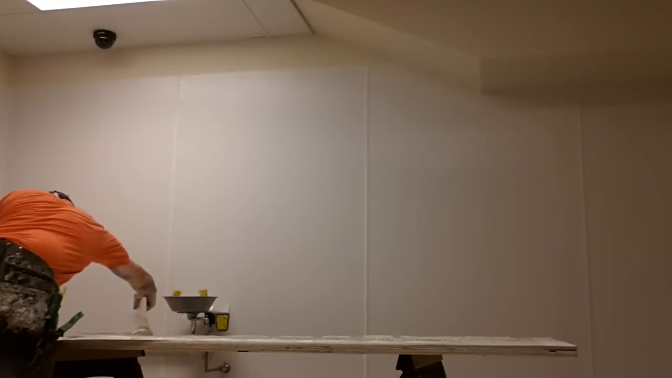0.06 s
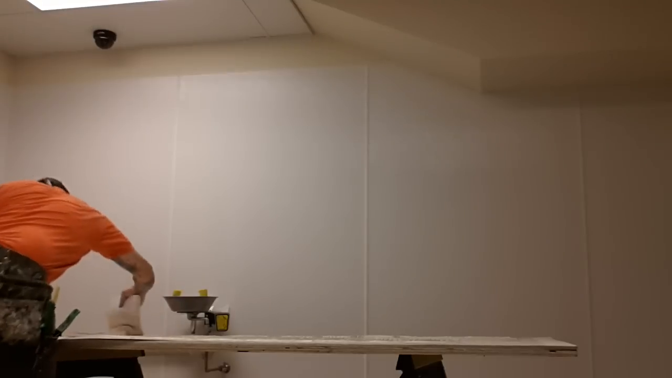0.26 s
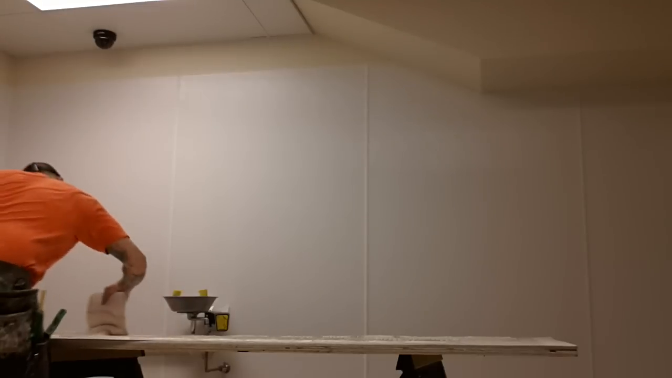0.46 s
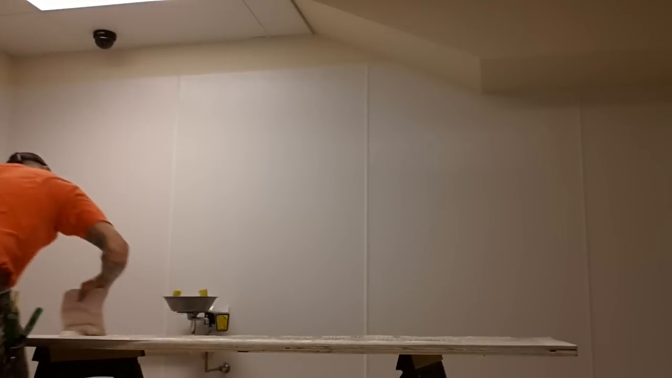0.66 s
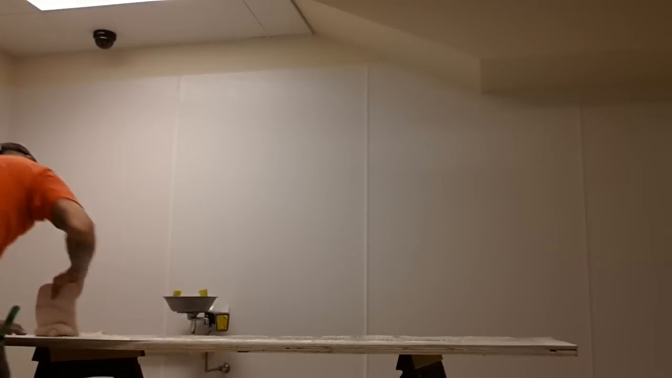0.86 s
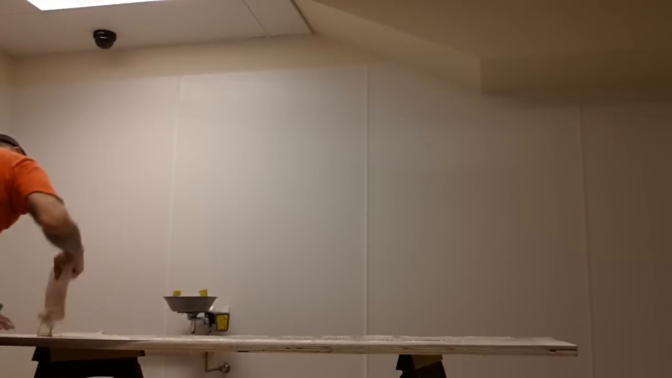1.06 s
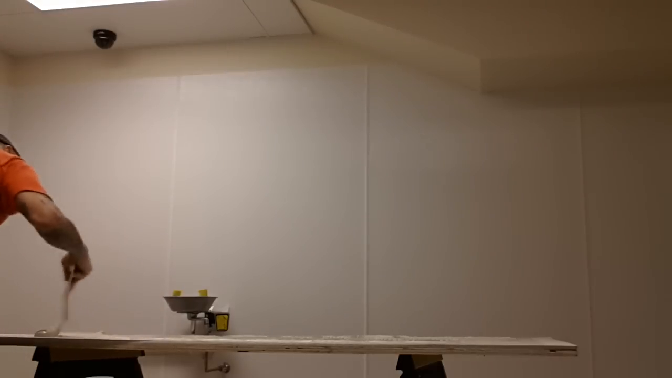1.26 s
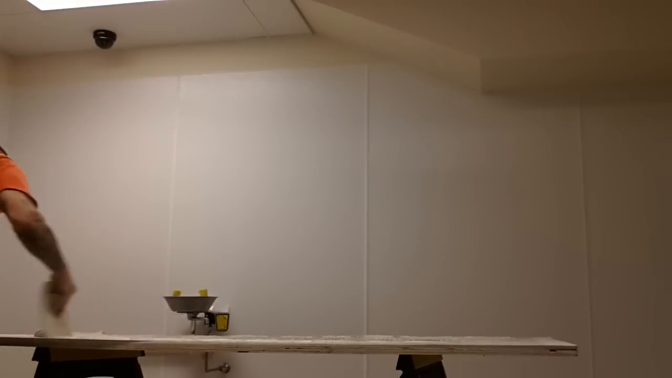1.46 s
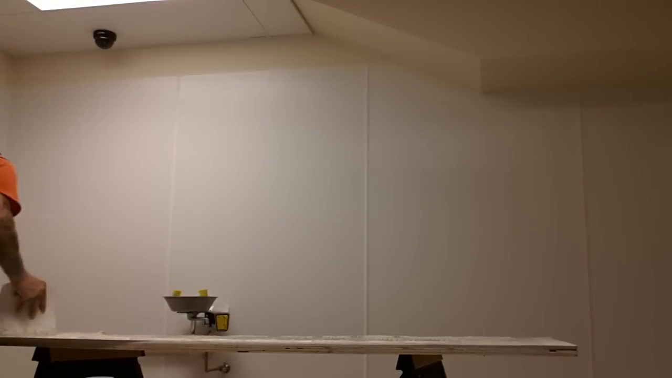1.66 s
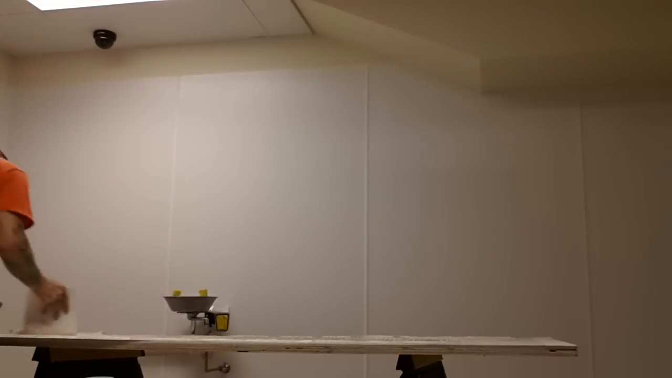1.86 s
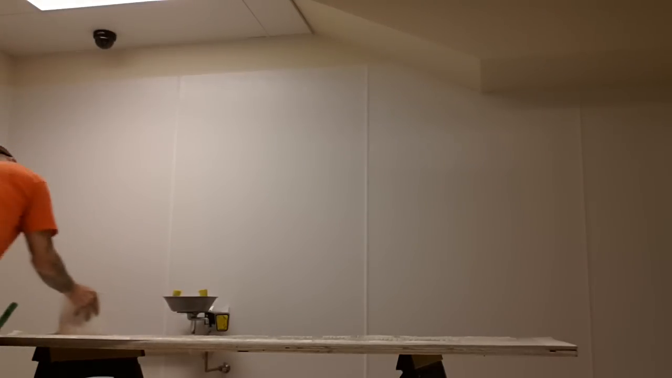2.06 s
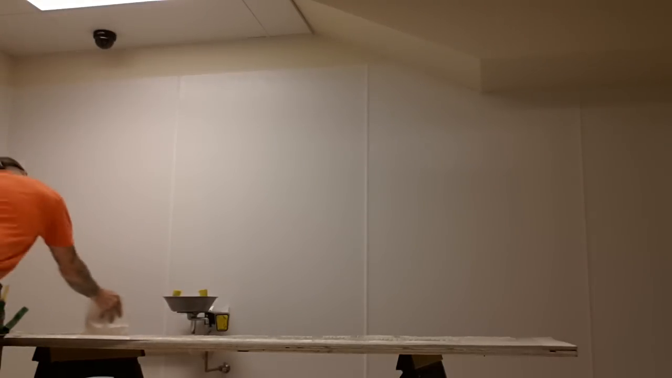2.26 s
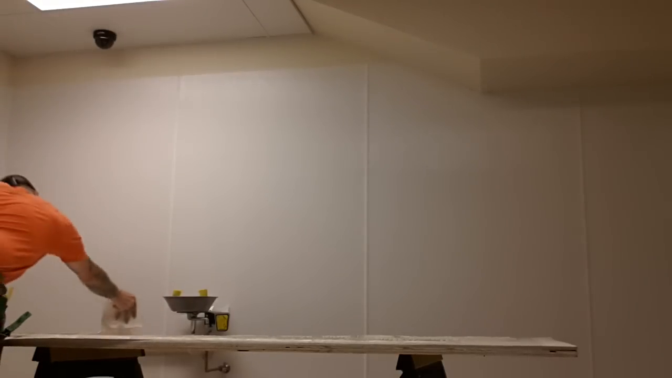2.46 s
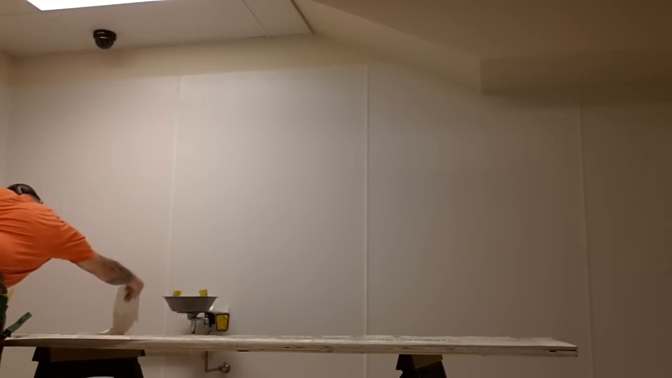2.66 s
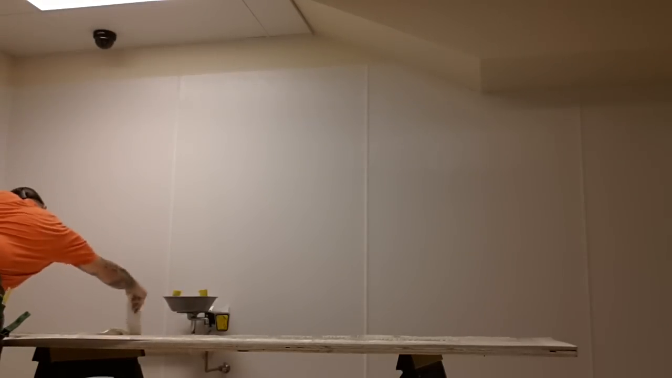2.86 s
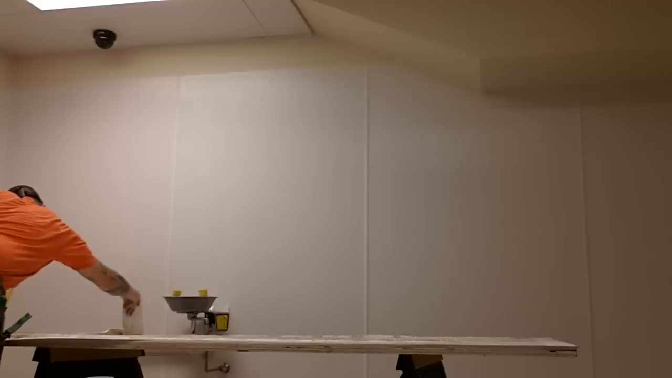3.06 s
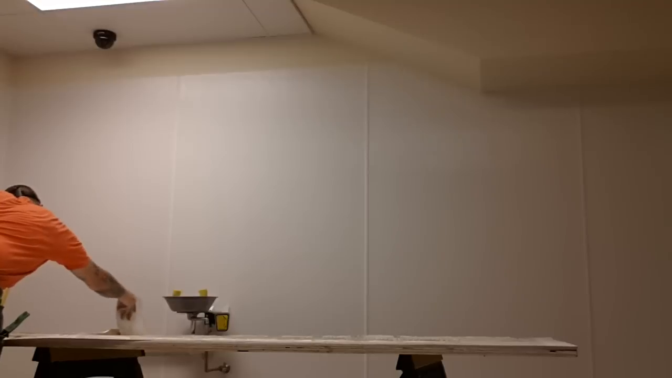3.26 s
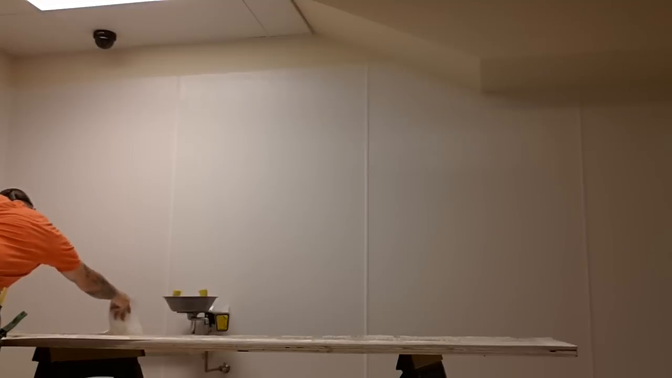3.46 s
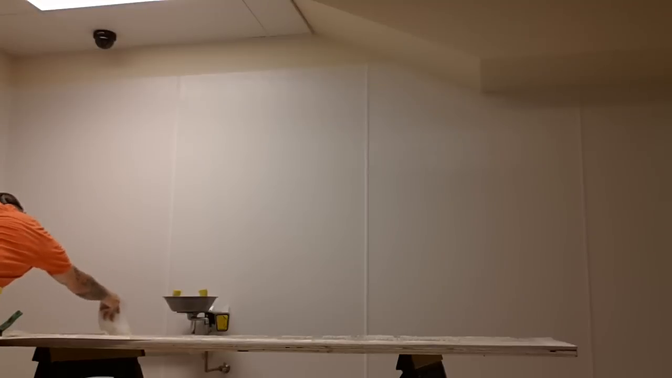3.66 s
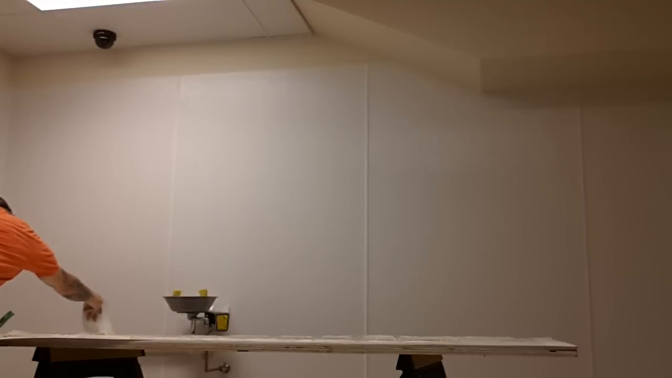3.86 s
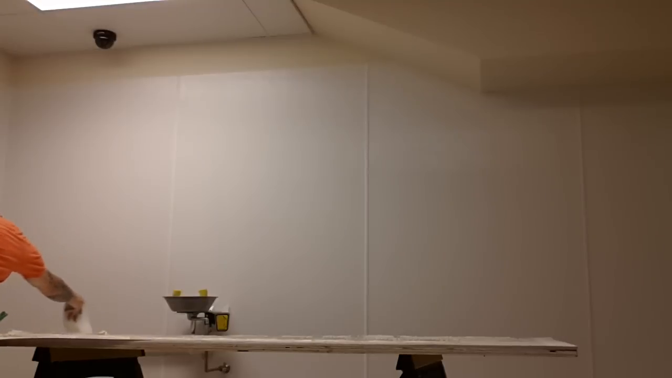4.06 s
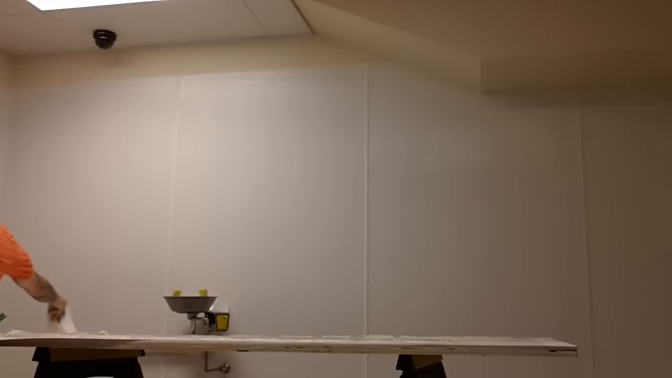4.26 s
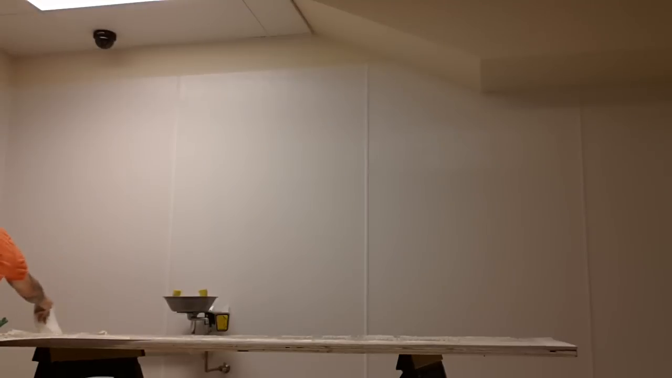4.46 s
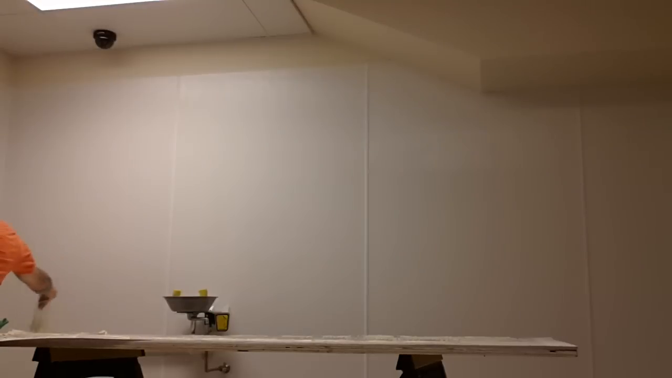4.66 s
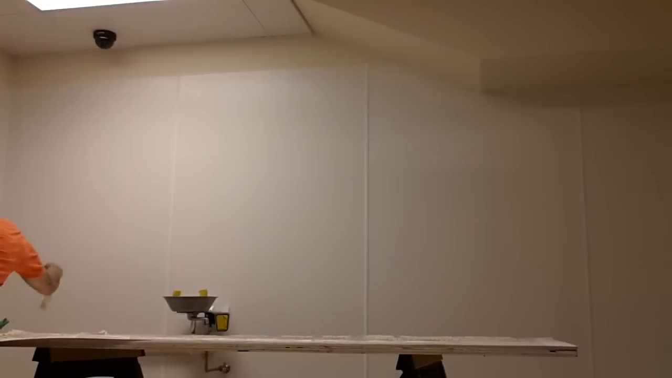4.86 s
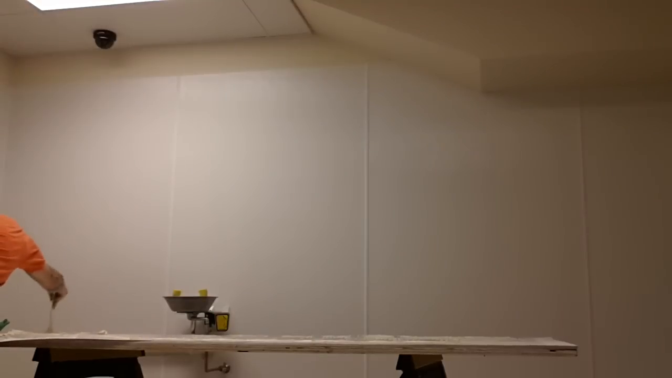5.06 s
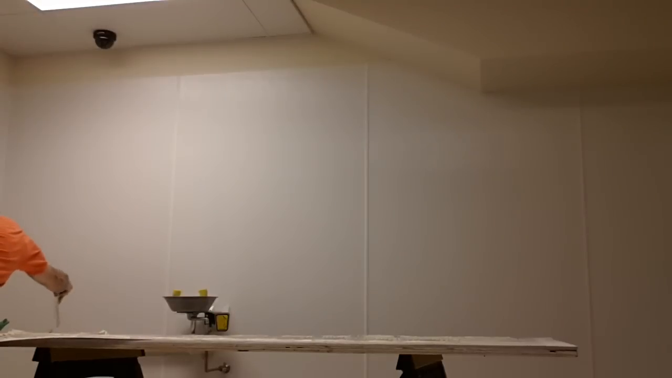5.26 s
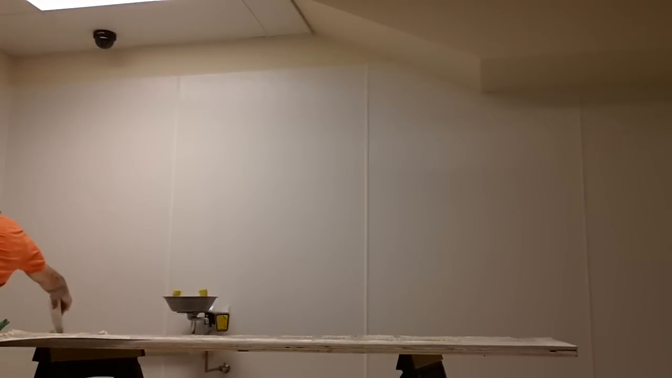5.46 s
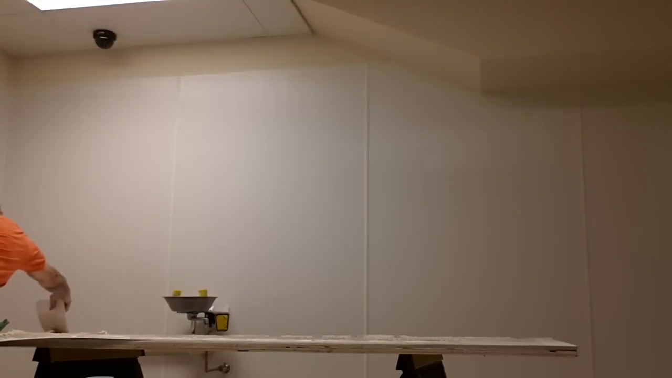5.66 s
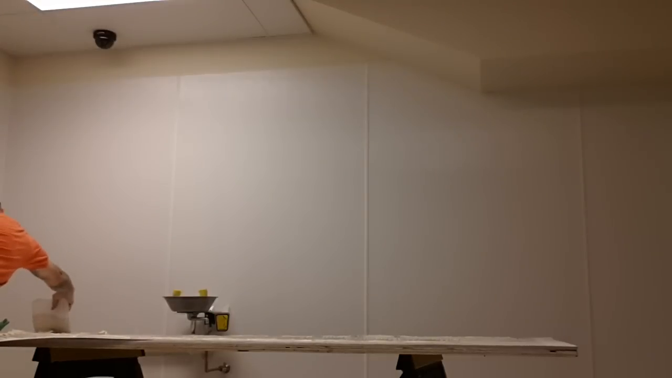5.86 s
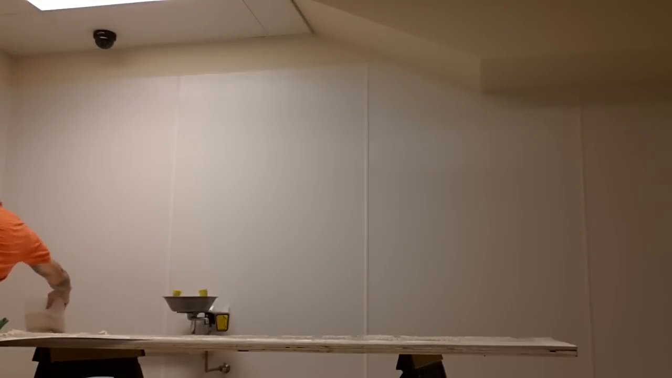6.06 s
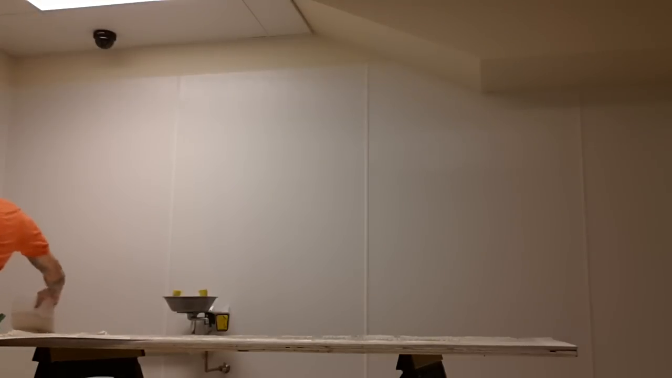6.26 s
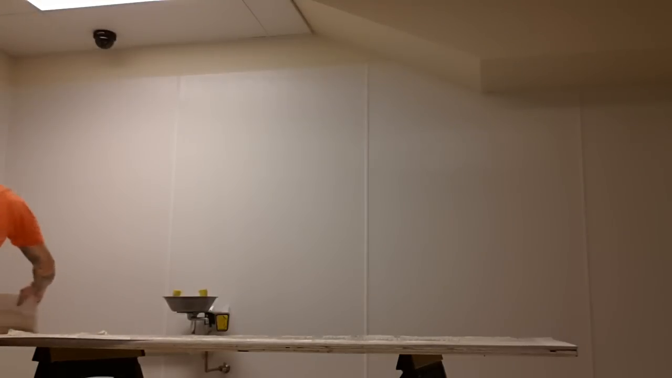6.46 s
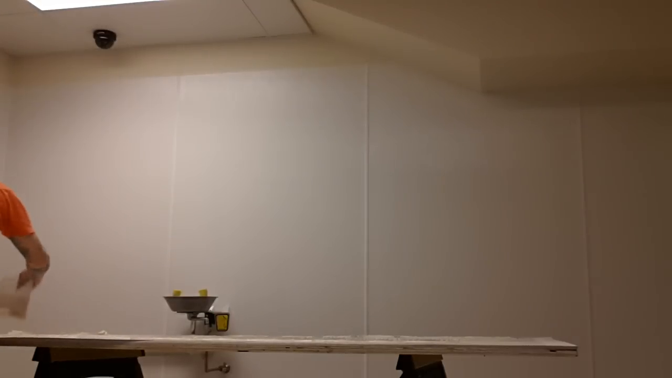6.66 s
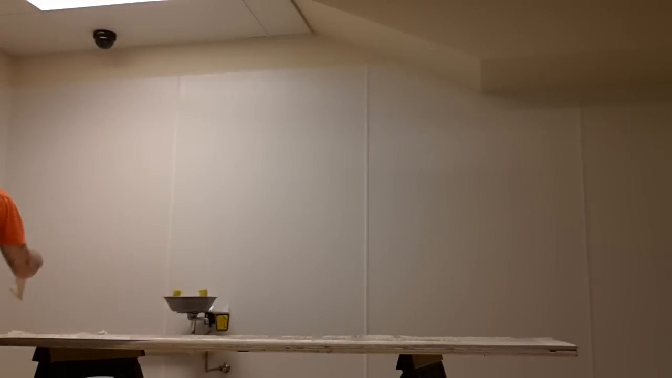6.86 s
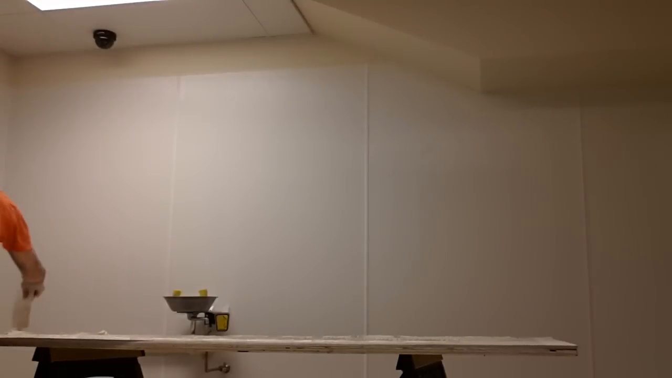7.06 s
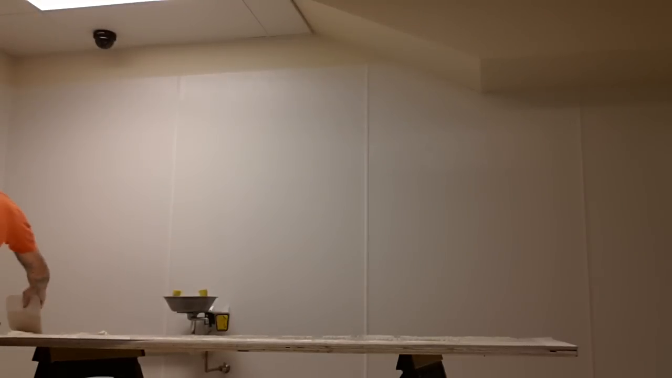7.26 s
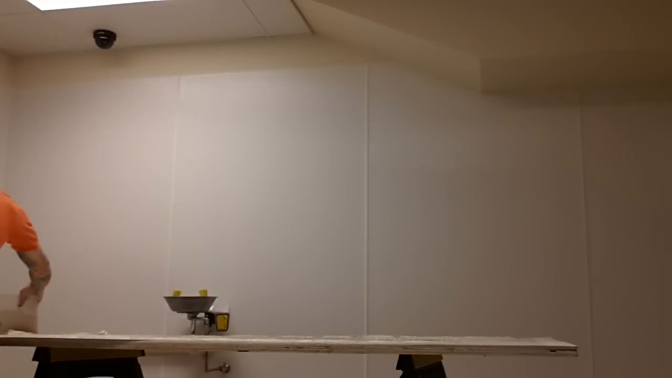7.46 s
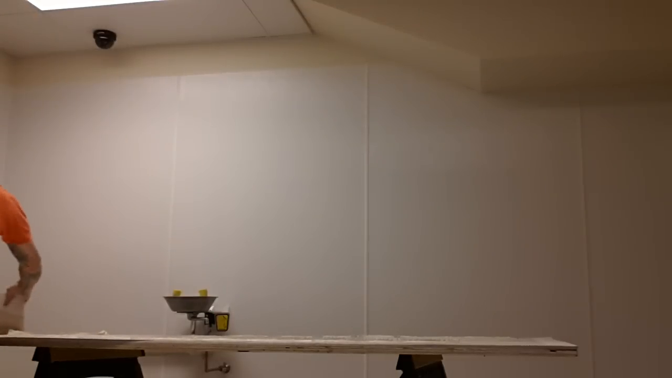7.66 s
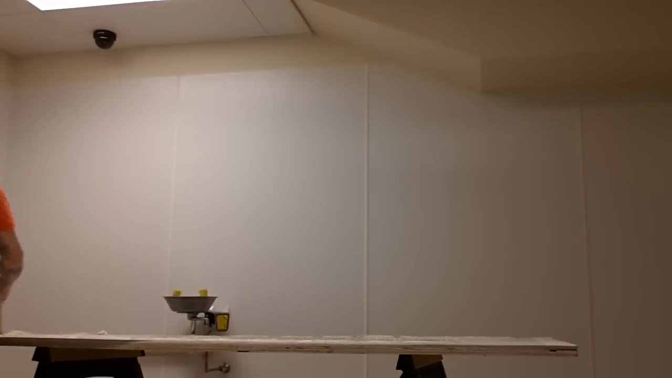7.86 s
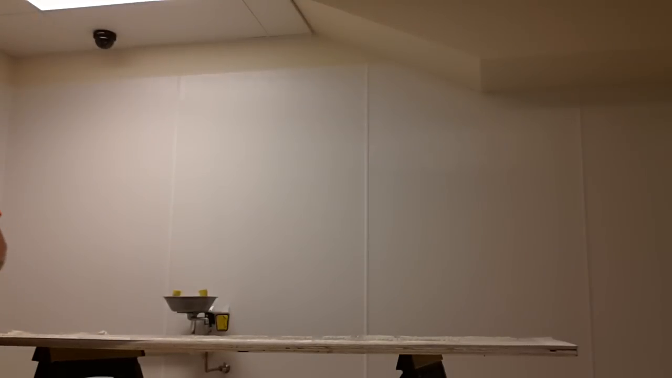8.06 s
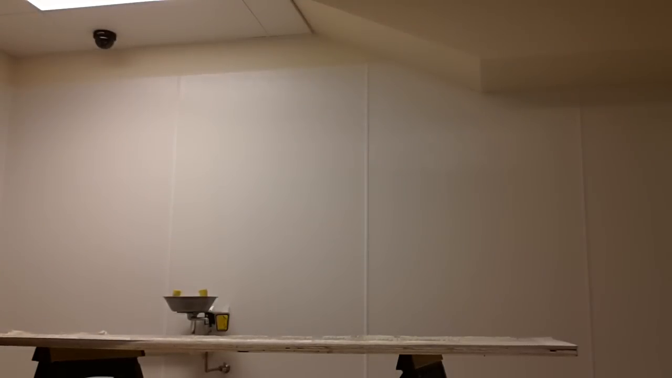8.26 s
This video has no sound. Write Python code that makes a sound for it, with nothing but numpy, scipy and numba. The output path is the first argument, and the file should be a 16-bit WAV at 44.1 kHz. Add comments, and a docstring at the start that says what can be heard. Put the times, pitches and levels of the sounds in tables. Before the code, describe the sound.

A steady low ventilation rumble with faint hiss fills a bare, hard-walled room. From 0 to 1.1 s a trowel drags with dense gritty hiss and hollow drumming, swelling around 0.5-0.8 s. At 1.2 s a sharp double slap rings the panel, with a weaker bounce at 1.43. A second scrape runs 1.65-2.8 s, deepest near 2.1. Four quick slaps clatter at 2.9-3.03 s, ringing into the echo. A softer, fuller drag follows at 3.5-4.7 s; a very faint high blade tone and tiny squeaks emerge around 4.6-5. Loud knocks hit at 5.04-5.17, with a small tap at 5.5. Another scrape grows brighter from 5.8 to 6.6 s, then light ticks at 6.9 lead into a rapid rattle of slaps from 7.05 to 7.31. A final drag lasts 7.55-8.2 s before easing off. Trestles give dull low shudders under impacts. Distant stereo phone perspective.

```python
"""In a bare, echoing room a steel trowel drags adhesive over a wide panel on trestles, some metres from a phone.
Dense grit clicks hiss on the blade and drum the panel; now and then the blade slaps the panel and bounces.
Slaps and drags are noise shaped by the room's echoes; ringing panel, singing blade and trestles are sine tones.
A ventilation rumble made of noise lies under it, and the phone's limiter turns the loudest moments down."""
import sys
import numpy as np
from scipy import signal
from scipy.fft import rfft, irfft
from scipy.io import wavfile
from scipy.ndimage import uniform_filter1d
from numba import njit

SR = 44100
rng = np.random.default_rng(int(sys.argv[2]) if len(sys.argv) > 2 else 0)


def store_pcm(level_fs):
    """Save levels as 16-bit WAV."""
    pcm = np.round(np.clip(level_fs, -1, 1) * 32767).astype(np.int16)
    wavfile.write(sys.argv[1], SR, np.atleast_2d(pcm).T)


N = 366912  # length of the sound in samples

# One list per trowel stroke: (time [s], blade hiss level [dB], panel drumming level [dB])
STROKE_LEVELS = [
    [(0.0, -42.5, -50.5), (0.25, -41, -47), (0.52, -37.5, -38.5), (0.8, -38.5, -39.5), (1.0, -41.5, -43.5),
     (1.07, -49, -54), (1.11, -60, -50), (1.19, -64, -75)],
    [(1.65, -38, -46.5), (1.87, -39.5, -43.5), (2.1, -37.5, -37.5), (2.5, -37.5, -44), (2.69, -39.5, -54),
     (2.74, -45.5, -72), (2.87, -53, -75)],
    [(3.5, -45.5, -50), (3.6, -46.5, -48.5), (3.8, -42, -45), (4.04, -40, -43.5), (4.3, -40.5, -50.5),
     (4.49, -39, -58), (4.72, -46.5, -54), (5.03, -53.5, -63)],
    [(5.62, -56, -52), (5.8, -50.5, -54), (5.97, -47, -53.5), (6.1, -42, -56), (6.45, -39, -47.5),
     (6.58, -36.5, -44.5), (6.72, -44, -51.5), (6.89, -48.5, -51.5)],
    [(7.55, -43, -47), (7.75, -39.5, -46.5), (8.08, -39.5, -46), (8.2, -41, -48.5), (8.28, -50.5, -49.5)],
]
# For each stroke, how much deeper the panel drums where the blade works: (lift of the second band [dB])
STROKE_DEPTHS = [-5.5, -14, 8.5, 2, 1]
# Slaps and bounces: (time [s], wet smack on the blade [dB], knock of the panel [dB],
# extra depth of the knock [dB], extra bite at 1-1.6 kHz [dB], fading time of the contact [ms])
SLAP_EVENTS = [(1.199, -17, -17, -14, 1, 7.4), (1.209, -14.5, -9.5, 2, 2.5, 4.5),
               (1.427, -21.5, -22, -8, 6.5, 2), (1.437, -21.5, -25.5, 8.5, -8, 5.9),
               (2.886, -12, -10, -6, 2.5, 2.6), (2.940, -16.5, -17, 5, 5, 12),
               (2.990, -18, -10.5, -8, 5.5, 3.8), (3.028, -20, -16, -2, -4, 2.6),
               (5.043, -11, -10, -1, -3, 8), (5.100, -14, -12.5, 0, 2, 45), (5.170, -20.5, -20, 1, 4, 3.9),
               (5.228, -44, -26, -13, -6, 3), (5.496, -32.5, -33, 7.5, 1.5, 3), (5.570, -44, -48, 8, 2, 4),
               (5.750, -41, -46, 10, 1, 41), (6.906, -26.5, -43, 2, -2.5, 5),
               (6.925, -26.5, -44, 3, -12, 2.2), (7.05, -12.5, -18.5, -1, 1, 2.9),
               (7.079, -13, -17.5, 10, -2, 14), (7.125, -15, -38, 5, 1, 3.9), (7.182, -12, -17, 7, 1, 3.2),
               (7.225, -21, -25, -1, 4, 5), (7.311, -21, -20, 7.5, -4, 2.5)]
# Tone colour of the slaps before the panel adds its own: (frequency [Hz], relative level per Hz [dB])
SLAP_SPECTRUM = [(82, -40), (140, -13.5), (215, -9.5), (252, -11.5), (380, -7.5), (489, -9), (529, -4),
                 (738, -4.5), (798, -3.5), (1030, -3.5), (1160, -2.5), (2430, -5.5), (6600, -11.5),
                 (12100, -31.5), (15000, -85)]
# Tone colour of the dragging before the panel adds its own: (frequency [Hz], relative level per Hz [dB])
DRAG_SPECTRUM = [(88, -23), (150, -14), (172, -1.5), (225, -8.5), (294, 3.5), (331, 2.5), (371, 5),
                 (433, 3), (701, 3.5), (1030, -1), (1640, 1.5), (3270, -7), (6680, -7), (13900, -29),
                 (15000, -48)]
# Bending tones of the panel: (frequency [Hz], width [Hz], relative level [dB])
PANEL_MODES = [(253, 6.7, 3.5), (306, 7.3, 0), (358, 24, -7.5), (406, 14, -6.5), (482.4, 12, 1),
               (565, 13, -8), (699, 17, -6), (735, 3, 2), (884, 10, -10)]
# Single panel tones where the blade lands or presses: (time [s], frequency [Hz], level [dB], 60 dB fade [s])
PANEL_RINGS = [(1.21, 477, -9, 0.2), (1.212, 882, -13.5, 0.32), (1.211, 1420, -13.5, 0.17),
               (1.24, 508, -10, .18), (1.262, 598, -10, 0.22), (1.27, 510, -17, .2), (1.4, 504, -22, 0.35),
               (1.429, 160, -31, 0.8), (1.43, 1300, -21, 0.33), (1.45, 680, -22.5, 0.22),
               (1.5, 315, -26.5, 0.34), (2.89, 811, -14.5, .3), (2.931, 254, -15.5, 0.42),
               (2.92, 647, -16, 0.23), (2.986, 900, -13, 0.32), (3.035, 881, -16, 0.36),
               (3.091, 990, -22, 0.23), (3.03, 1246, -19, 0.32), (3.03, 330, -21.5, 0.3),
               (3.111, 254.4, -22, 0.51), (3.3, 718, -37, 0.53), (3.53, 486, -36.5, 0.77),
               (3.62, 321, -34.5, 0.81), (3.75, 453, -37, .6), (3.85, 319, -38, .6), (4.2, 400, -44, .5),
               (4.1, 300.5, -37.5, 0.86), (5.045, 756, -12, 0.5), (5.045, 887, -16, .3),
               (5.09, 633, -17, .3), (5.165, 758, -15, .3), (5.22, 915, -18, .2), (5.06, 486.5, -14.5, 0.5),
               (5.09, 297, -16, 0.49), (5.17, 437, -18, 0.25), (5.29, 768, -20, 0.17),
               (5.33, 260, -28.5, 0.14), (5.38, 490, -29, 0.36), (5.494, 386, -27.5, 0.25),
               (5.496, 1780, -34, .25), (5.56, 268, -31.5, 0.18), (7.048, 576, -7, 0.086),
               (7.048, 318, -13.5, .12), (7.051, 1710, -17, 0.088), (7.083, 466, -8, .07),
               (7.095, 272, -12, 0.3), (7.124, 270, -11, 0.21), (7.19, 567, -14, 0.27),
               (7.23, 588, -18.5, 0.37), (7.225, 1116, -15.5, 0.11), (7.195, 307, -17, 0.22),
               (7.225, 267, -19, 0.4), (7.31, 447, -13.5, .14), (7.345, 283, -16.5, 0.27),
               (7.34, 588, -23, .3)]
# Brief squeaks of the blade edge:
# (time [s], frequency [Hz], level [dB], length [s], left minus right [dB])
EDGE_SQUEAKS = [(4.09, 1200, -51, .1, -15), (4.77, 3526, -52, .12, 3), (4.88, 4650, -54, .09, 4),
                (4.88, 7250, -56, .1, -16), (4.9, 4050, -54, .1, 0), (4.7, 4900, -63, .12, -16),
                (4.64, 4750, -53, .05, 4), (4.91, 6850, -52, 0.16, -16), (4.93, 5200, -55, .1, 4)]
# Shudders of the trestles: (time [s], level [dB])
TRESTLE_SHUDDERS = [(1.22, -34.5), (1.468, -43), (2.887, -36.5), (3.4, -43), (3.58, -47), (5.059, -35),
                    (5.13, -33), (5.519, -45), (7.33, -41), (7.899, -48)]
# Tone colour of the ventilation: (frequency [Hz], relative level per Hz [dB])
AIR_SPECTRUM = [(20, -15), (40, -25.5), (75, -10), (125, -21.5), (150, -1), (200, -3), (240, -11.5),
                (600, -18), (1200, -19.5), (3500, -23.5), (5500, -32.5), (6800, -31), (8000, -44),
                (15000, -59)]
# How long the room's echoes take to fade by 60 dB: (frequency [Hz], time [s])
ROOM_FADE = [(125, 1.1), (250, 1.02), (500, 0.86), (1000, 0.88), (1400, 0.83), (2000, 0.85), (4000, 0.74),
             (8000, 0.57), (14000, 0.084)]
# How alike left and right sound: (frequency [Hz], correlation [-1 to 1])
STEREO_LIKENESS = [(30, .75), (130, .88), (250, .86), (400, .78), (700, .3), (1200, -.08), (3100, 0.),
                   (15000, 0.)]
# Stereo balance: (frequency [Hz], left minus right [dB])
STEREO_BALANCE = [(60, -2.5), (200, 1.3), (1400, 2), (3000, 1.5), (5000, 7.5), (7000, -10), (10000, -1.5),
                  (15000, 0)]
# Borders of the seven energy bands, low to high: (frequency [Hz])
BAND_EDGES = (110, 220, 520, 1000, 1600, 2600, 5000, 12000)
# Share of each of the seven bands, low to high, in the drag's hiss and drumming: (level [dB])
DRAG_HISS_SHARES = (-30, -14, -18, -12.5, -10.5, -5.5, 0.5)
DRAG_DRUM_SHARES = (-14.5, -0.5, -0.5, -5, -7, -29, -30)
# Share of each of the seven bands, low to high, in the slap's smack and knock: (level [dB])
SLAP_SMACK_SHARES = (-31, -11, -23, -9.5, -6.5, -4.5, -0.5)
SLAP_KNOCK_SHARES = (-22, -9, -1.5, -9, -13.5, -35, -30)

AIR_DB = -45
PANEL_RING_DB = -7.0  # shifts all the panel's bending tones
TRESTLE_HZ, TRESTLE_T60_S = 75.2, 0.48
# The blade sings as it lifts: it swells to a peak, then fades until the next slap
SING_HZ, SING_DB, SING_SWELL_DB_S, SING_FADE_DB_S = 6635, -47.5, 36, 23
SING_START_S, SING_PEAK_S, SING_END_S = 3.8, 4.69, 5.03
RING_RISE_S, RING_SPREAD_RAD = 0.0062, 0.32  # the spread between the ports is for a 420 Hz tone
RING_BEAT_HZ, RING_BEAT_DEPTH = 14, .3
PORT_HZ, PORT_WIDTH_HZ, PORT_DB = 6370, 1400, 3
LIMIT_DB, LIMIT_RATIO = -13, 1.46
ATTACK_S, RELEASE_S, LOOK_AHEAD_S = 0.00065, 0.27, 0.0012
TOP_HZ = 15000


def undb(db):
    """Turn a level in dB into a gain."""
    return 10 ** (np.asarray(db) / 20)


def unit(x):
    """Scale a signal to an average strength (rms) of 1."""
    return x / np.sqrt(np.mean(x ** 2))


def frequencies(size):
    """Frequencies in Hz of the bins of a spectrum."""
    return np.fft.rfftfreq(size, 1 / SR)


def along(table, size):
    """Read a (frequency, value) table at every bin of a spectrum."""
    table_hz, value = np.transpose(table)
    return np.interp(np.log(frequencies(size) + 1), np.log(table_hz), value)


def one_pole(x, keep, start):
    """Follow a signal sluggishly, keeping a fixed share of the old value at each sample."""
    return signal.lfilter([1 - keep], [1, -keep], x, zi=[start])[0]


def stereo_noise(size):
    """Spectra of noise at two ports close together: alike in the bass, unrelated in the treble."""
    mid, side = rfft(rng.standard_normal((2, size)))
    like = np.clip(along(STEREO_LIKENESS, size), -.9, .99)
    balance = undb(along(STEREO_BALANCE, size) / 2)
    mid = mid * np.sqrt((1 + like) / 2)
    side = side * np.sqrt((1 - like) / 2)
    # the small cavity in front of each capsule resonates
    offset = 2 * (frequencies(size) - PORT_HZ) / PORT_WIDTH_HZ
    port = undb(PORT_DB / (1 + offset ** 2))
    return np.array([(mid + side) * balance, (mid - side) / balance]) * port


def air():
    """Steady ventilation rumble and faint hiss: noise coloured by its table."""
    spectrum = stereo_noise(N) * undb(along(AIR_SPECTRUM, N))
    return undb(AIR_DB) * unit(irfft(spectrum, N))


def panel_gain(hz):
    """The panel's bending tones stand out of whatever shakes it."""
    power = 1
    for mode_hz, width_hz, db in PANEL_MODES:
        power = power + undb(2 * (db + PANEL_RING_DB)) * 20 / (1 + (2 * (hz - mode_hz) / width_hz) ** 2)
    return np.sqrt(power)


def room(energy, colour, direct, linger, build_s=0.0012, patchy_db=2.0, even_hz=900., moves_per_s=16., count=17):
    """Dense echoes of bare walls: in each band, energy builds up and drains at the room's rate.

    energy: seven bands against time; direct: share heard at once; linger: share of the room's fading time.
    """
    hz = frequencies(N)
    noise = stereo_noise(N) * undb(along(colour, N)) * panel_gain(hz)
    # even out the noise power, so that each band gets the energy asked for
    power = np.mean(abs(noise) ** 2, axis=0) * 2 / N ** 2
    edges = np.array(BAND_EDGES)
    band_power = [[power[(hz >= low) & (hz < high)].sum()] for low, high in zip(edges, edges[1:])]
    energy = energy / band_power

    middles = np.log(edges[1:] * edges[:-1]) / 2
    centres = np.linspace(np.log(60), np.log(16000), count)
    spots = np.arange(0, N + SR, int(SR / moves_per_s))
    fade_hz, fade_s = np.array(ROOM_FADE).T
    soft = np.exp(-1 / (build_s * SR))  # the first echoes arrive one by one
    out = 0
    for k, centre in enumerate(centres):
        band = irfft(noise * np.interp(np.log(hz + 1), centres, np.arange(count) == k), N)
        # between the middles of the seven bands, take a blend of two neighbours
        blend = np.array([np.interp(centre, middles, row) for row in np.eye(len(middles))])
        blend = blend ** 2 / np.sum(blend ** 2)
        given = blend @ energy
        t60 = linger * np.interp(centre, np.log(fade_hz), fade_s)
        keep = undb(-2 * 60 / t60 / SR)
        held = one_pole(given, keep, given[:SR // 20].mean())
        # the tool moves, so each band meets other room modes from moment to moment, less so in the dense treble
        wander_db = patchy_db / np.sqrt(1 + np.exp(centre) / even_hz)
        wander = np.interp(np.arange(N), spots, rng.standard_normal(len(spots)))
        held *= undb(2 * wander_db * wander)
        heard = one_pole(held + direct * given, soft, held[0])
        out = out + band * np.sqrt(heard)
    return out


def parts(blade_db, panel_db, depth_db, blade_shares_db, panel_shares_db):
    """Energy in seven bands from blade plus panel; depth lifts the panel's second band."""
    deep = np.arange(len(panel_shares_db)) == 1
    blade_bands_db = np.add.outer(np.array(blade_shares_db), blade_db)
    panel_bands_db = np.add.outer(np.array(panel_shares_db), panel_db) + np.outer(deep, depth_db)
    return undb(2 * blade_bands_db) + undb(2 * panel_bands_db)


def trestles(rise_s=0.004):
    """The supports, pushed softly, shudder in one low tone that dies away."""
    out = np.zeros(N + SR)
    t = np.arange(SR) / SR
    envelope = (1 - np.exp(-t / rise_s)) * undb(-60 * t / TRESTLE_T60_S)
    shudder = envelope * np.sin(2 * np.pi * TRESTLE_HZ * t)
    for s, db in TRESTLE_SHUDDERS:
        start = int(s * SR)
        out[start:start + SR] += undb(db) * shudder
    return out[:N]


def blade(sing_lean_db=-17.0):
    """Thin steel sings and squeaks in pure tones whose strength wavers at each port and whose pitch wavers."""
    t = np.arange(N) / SR
    half = np.array([[.5], [-.5]])  # left and right each take half of the lean
    slow = uniform_filter1d(rng.standard_normal((3, N)), size=900)
    slow = unit(uniform_filter1d(slow, size=900))
    sway = 0.84 * slow[2]  # radians

    db = SING_DB - np.maximum(SING_SWELL_DB_S * (SING_PEAK_S - t), SING_FADE_DB_S * (t - SING_PEAK_S))
    singing = (t > SING_START_S) & (t < SING_END_S)
    sine = np.sqrt(2) * np.sin(2 * np.pi * SING_HZ * t + sway / 2)
    tone = sine * undb(db + sing_lean_db * half) * singing
    for s, hz, db, length, lean_db in EDGE_SQUEAKS:
        on = slice(int(s * SR), int((s + length) * SR))
        swell = np.sin(np.pi * np.clip((t[on] - s) / length, 0, 1)) ** .5
        squeak = np.sin(2 * np.pi * hz * t[on] + sway[on]) * swell
        tone[:, on] += undb(db + lean_db * half) * squeak
    return tone * (1 + .4 * slow[:2])


def rings():
    """Single panel tones swell as the room fills and die away, a little out of step at the two ports."""
    out = np.zeros((2, N + 2 * SR))
    chances = rng.standard_normal((len(PANEL_RINGS), 3))
    for (s, hz, db, t60), (phase, lag, beat) in zip(PANEL_RINGS, chances):
        t = np.arange(int(min(t60, 2) * SR)) / SR
        shape = (1 - np.exp(-t / RING_RISE_S)) * undb(db - 60 * t / t60)
        # close pairs of modes beat
        beat_hz = RING_BEAT_HZ * (1 + beat / 4)
        shape *= 1 + RING_BEAT_DEPTH * np.cos(2 * np.pi * beat_hz * t)
        lead = RING_SPREAD_RAD * hz / 420 * lag * np.array([[1], [-1]])
        start = int(s * SR)
        out[:, start:start + len(t)] += shape * np.sin(2 * np.pi * hz * t + np.pi * phase + lead)
    return out[:, :N]


def slaps(fill_s=0.044):
    """Each contact gives off a short burst of energy, its level times fill_s, which the room then holds."""
    energy = np.zeros((len(BAND_EDGES) - 1, N + SR))
    t = np.arange(SR // 5) / SR
    bite = np.arange(len(energy))[:, None] == 3  # the 1-1.6 kHz band
    for s, smack_db, knock_db, depth_db, bite_db, ms in SLAP_EVENTS:
        burst = np.exp(-t * 1000 / ms) * 1000 / ms * fill_s
        bands = parts([smack_db], [knock_db], depth_db, SLAP_SMACK_SHARES, SLAP_KNOCK_SHARES)
        start = int(s * SR)
        energy[:, start:start + len(t)] += bands * undb(2 * bite_db * bite) * burst
    return room(energy[:, :N], SLAP_SPECTRUM, direct=0.028, linger=1.0)


def drag(clicks_hz=1530.0, scatter_db=1.5):
    """Grit under the edge gives dense clicks of uneven size that hiss on the blade and drum the panel."""
    t = np.arange(N) / SR
    s, hiss_db, drum_db = np.vstack(STROKE_LEVELS).T
    depths = np.repeat(STROKE_DEPTHS, [len(stroke) for stroke in STROKE_LEVELS])
    depth_db = np.interp(t, s, depths)
    hiss_db, drum_db = np.interp(t, s, hiss_db), np.interp(t, s, drum_db)

    chance = rng.random((2, N))
    click = chance[0] < clicks_hz / SR
    size = undb(-scatter_db * np.log(1 - chance[1]))
    grit = unit(click * size)
    energy = parts(hiss_db, drum_db, depth_db, DRAG_HISS_SHARES, DRAG_DRUM_SHARES)
    # a faint rub is heard mostly in its early echoes, which fade sooner
    return room(energy * grit ** 2, DRAG_SPECTRUM, direct=0.11, linger=0.3)


def scene():
    """The trowel at work in the room, over the rumble."""
    return air() + trestles() + blade() + rings() + slaps() + drag()


@njit
def follow(size, attack, release):
    """Level detector that rises fast and falls slowly."""
    out, level = np.empty(len(size)), 1e-6
    for i in range(len(size)):
        level += (size[i] - level) * (attack if size[i] > level else release)
        out[i] = level
    return out


def record(dry):
    """The phone's limiter looks slightly ahead and turns both channels down together; the top is cut."""
    level = follow(np.abs(dry).mean(axis=0), 1 / (ATTACK_S * SR), 1 / (RELEASE_S * SR))
    level = np.interp(np.arange(N) + LOOK_AHEAD_S * SR, np.arange(N), level)
    gain = np.minimum(1, undb(LIMIT_DB) / level) ** (1 - 1 / LIMIT_RATIO)
    limited = np.clip(dry * gain, -1, 1)
    top_cut = signal.ellip(12, .2, 95, TOP_HZ, fs=SR, output="sos")
    return signal.sosfilt(top_cut, limited)


dry = scene()
out = record(dry)
store_pcm(out)
```